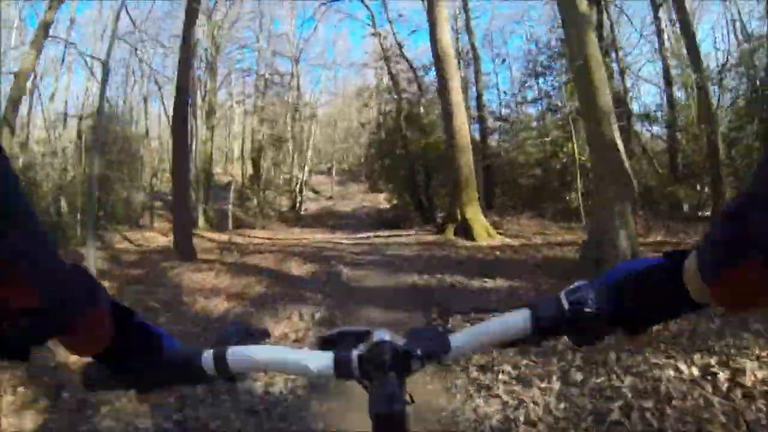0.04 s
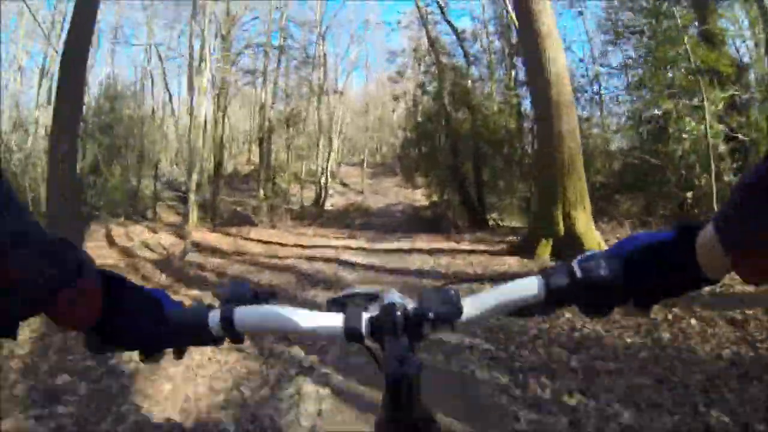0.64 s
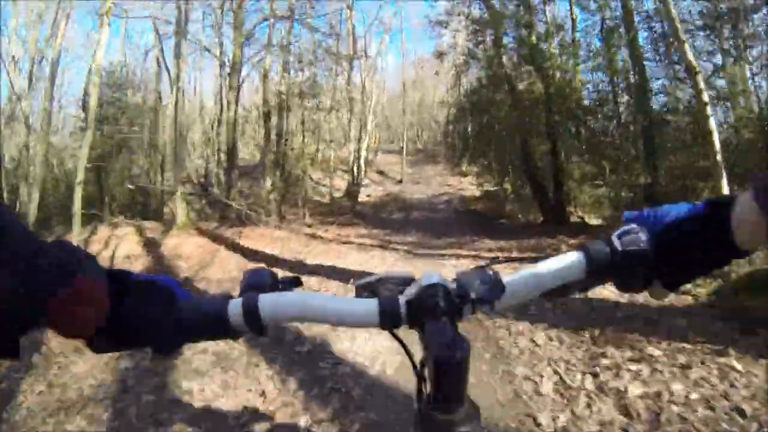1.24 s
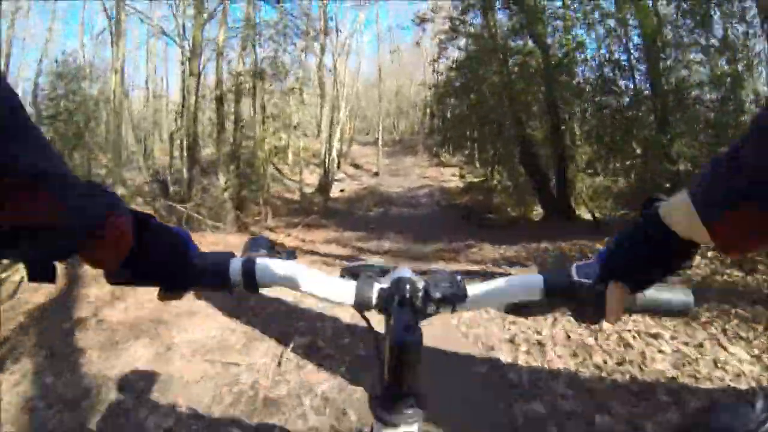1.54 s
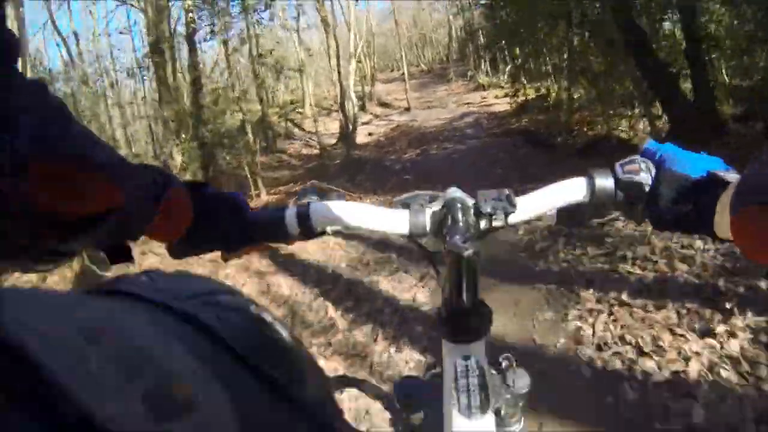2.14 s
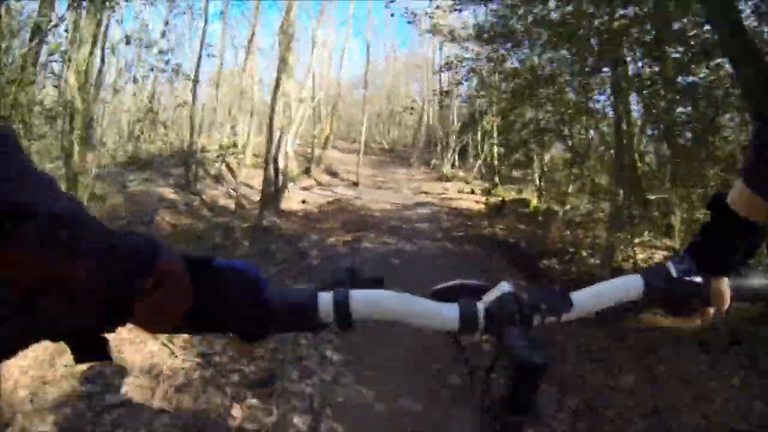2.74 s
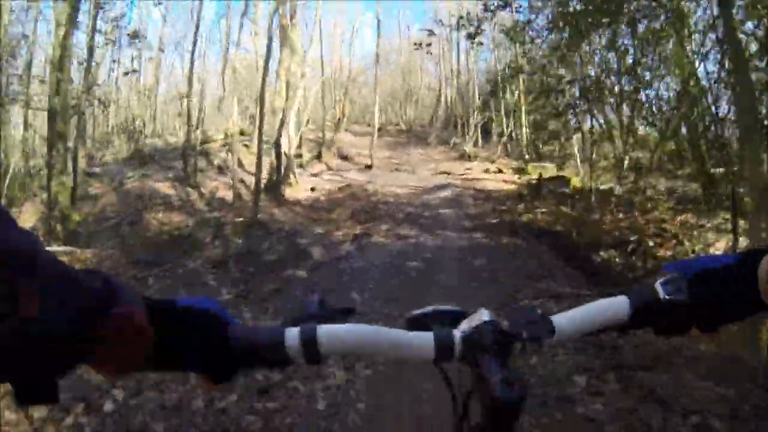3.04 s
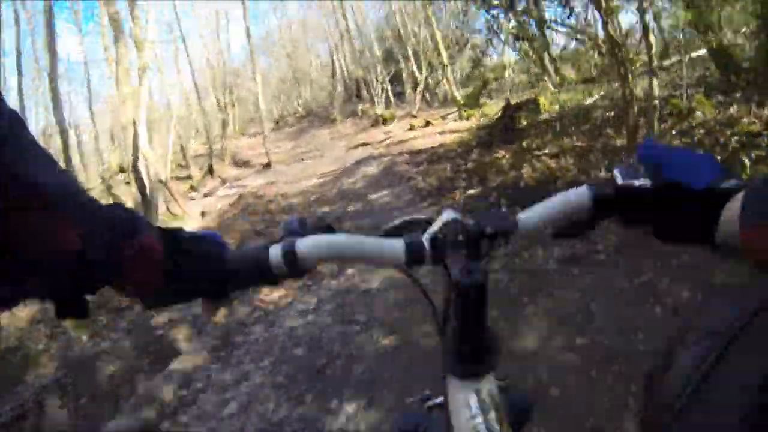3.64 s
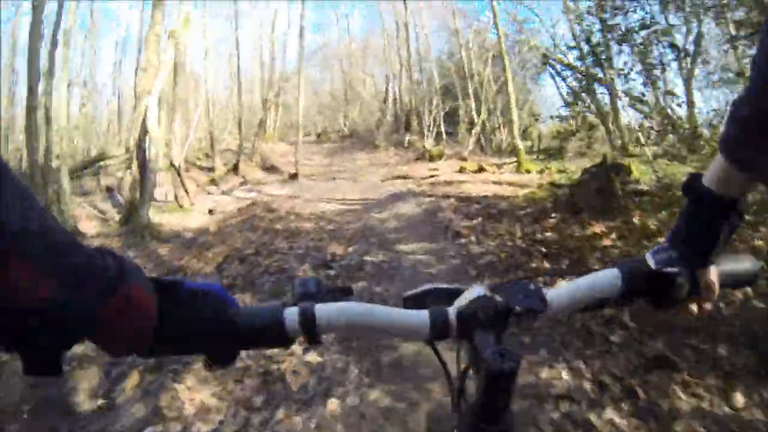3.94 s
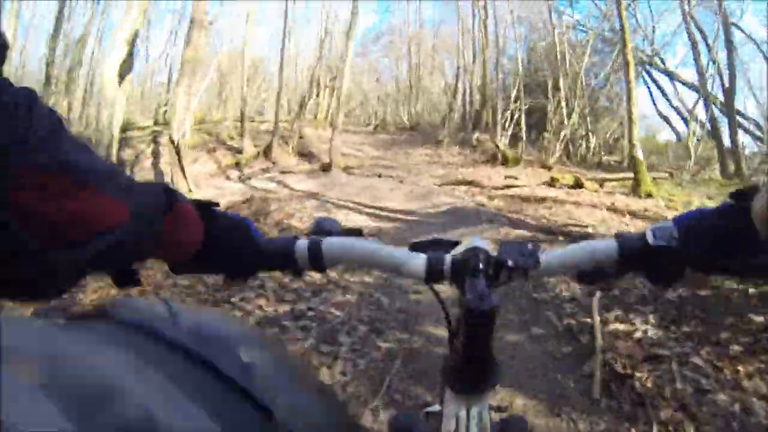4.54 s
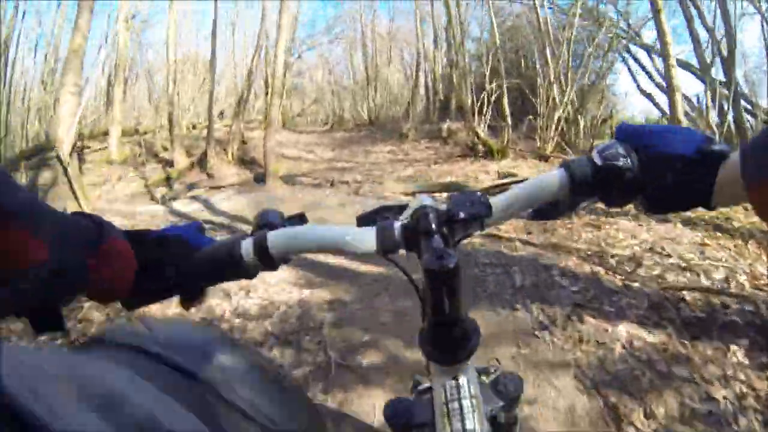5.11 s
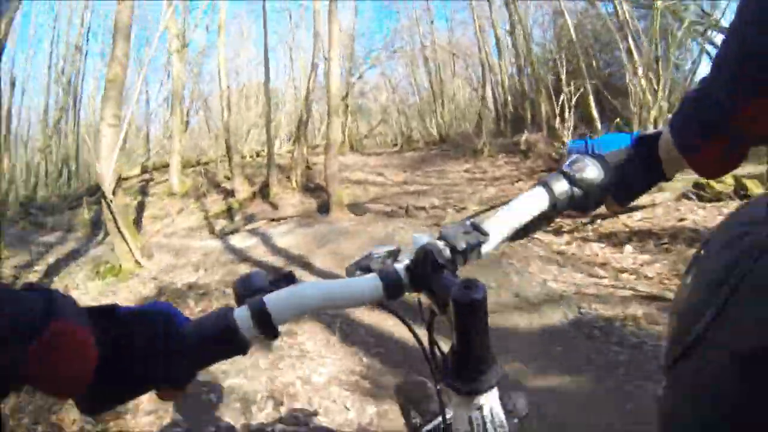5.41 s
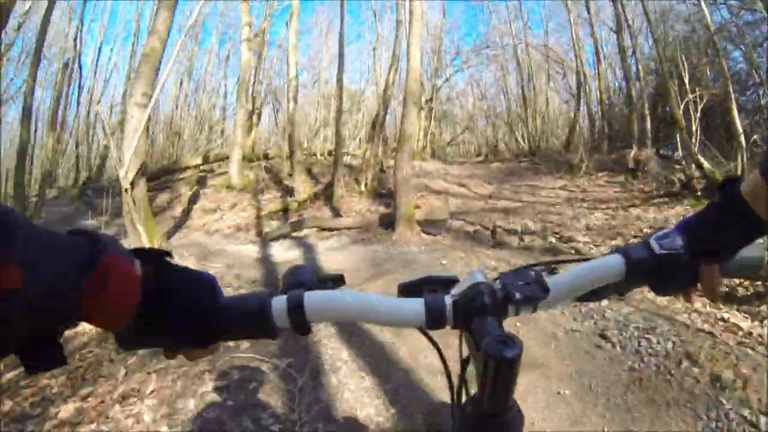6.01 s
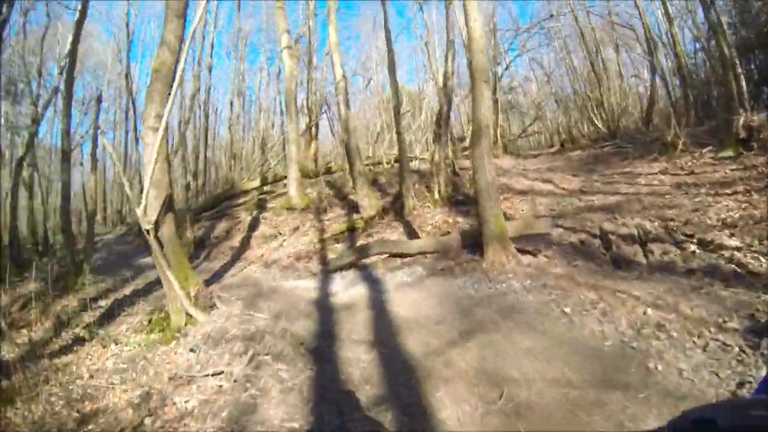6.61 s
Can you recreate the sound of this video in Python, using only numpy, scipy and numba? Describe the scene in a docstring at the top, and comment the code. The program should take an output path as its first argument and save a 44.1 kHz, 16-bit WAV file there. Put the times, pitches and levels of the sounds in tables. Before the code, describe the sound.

Irregular hollow plastic clacks and rattles over buffeting wind and the soft crunch of bicycle tyres on grit and leaves.

```python
"""Mountain bike on a dirt trail

The ride is heard from a body-worn camera in a plastic case. Air buffets the case while the tyres
crunch over grit, dry leaves and loose stones. Up front, bumps make the case rub and knock in its
mount. The gain control ducks after each loud knock, and the hardest ones overload."""
import sys
import numpy as np
from scipy import signal
from scipy.fft import rfft, irfft
from scipy.io import wavfile
from scipy.ndimage import uniform_filter1d
from numba import njit

SR = 44100
rng = np.random.default_rng(int(sys.argv[2]) if len(sys.argv) > 2 else 0)


def file_out(sig):
    """Save sig as 16-bit WAV at sys.argv[1]."""
    # one column per channel
    cols = np.atleast_2d(sig).T
    # limit, then scale
    lim = np.clip(cols, -1, 1)
    pcm = np.round(lim * 32767).astype(np.int16)
    wavfile.write(sys.argv[1], SR, pcm)


N = 302967
TIME = np.arange(N) / SR

# airflow rumble on the case, easing as the bike slows: t/s, level/dB
AIRFLOW_LEVELS = [(0.0, -19), (0.13, -24.5), (0.5, -34.5), (0.99, -29), (1.05, -41.5), (1.42, -23),
                  (2.2, -33), (2.58, -25.5), (2.64, -29), (3.1, -27), (3.14, -32), (3.37, -27.5),
                  (5.3, -36.5), (5.38, -42.5), (5.63, -34.5), (5.99, -50.5), (6.05, -40.5), (6.87, -65)]
# gusts: centre t/s, length/s, rise/dB
GUST_SWELLS = [(0.015, 0.15, 10.5), (.85, 0.16, 11), (1.93, .14, 9), (2.2, 0.41, 10), (2.47, 0.16, 11.5),
               (2.99, 0.31, 8.5), (3.25, 0.18, 6), (3.63, .32, 10.5), (4.06, 0.2, 9.5), (4.5, 0.3, 6),
               (4.98, 0.39, 7.5)]
# deep thump of the big eddies: f/Hz, level/dB
BUFFET_SPECTRUM = [(12, -1), (30, 3), (80, 5.5), (130, 0.5), (190, -13.5), (280, -26), (500, -45.5),
                   (2000, -110)]
# low-mid flutter of the small eddies: f/Hz, level/dB
EDDY_SPECTRUM = [(80, -11), (170, 1.5), (250, -4.5), (350, -9.5), (480, -15.5), (650, -20.5), (900, -25.5),
                 (1300, -35), (3000, -74.5), (9000, -110)]
# tyres biting into loose ground: centre t/s, length/s, rise/dB
TYRE_BITES = [(0, 0.37, 12), (.9, 0.4, 4), (1.8, 0.6, 4.5), (2.4, .4, 4), (3.05, 0.31, 5), (3.65, .22, 5.5),
              (4.19, 0.18, 9.5), (5.25, 0.15, 8), (5.68, 0.19, 8.5), (6.23, 0.28, 9), (6.44, 0.2, 7.5)]
# tone of the tread on dirt: f/Hz, level/dB
TREAD_SPECTRUM = [(150, -9), (400, 3), (900, 4.5), (1250, 0.5), (1800, 2), (2350, -9), (3200, -16.5),
                  (4350, -24), (6000, -31), (7400, -36.5), (10500, -27), (15000, -47.5)]
# case resonances that colour the tyres: f/Hz, width/Hz, level/dB
TREAD_RESONANCES = [(1820, 110, 1.5), (2890, 270, -5), (3500, 200, -13), (5000, 240, -20.5),
                    (8350, 380, -25), (10400, 110, -21)]
# case modes (two of the shell, then mount, bracket and the rest): f/Hz, t60/s, level/dB
CASE_MODES = [(755, 0.024, -15), (894, 0.019, 0.5), (1659, 0.01, 6.5), (1416, 0.014, -8.5),
              (1050, .011, -8), (1975, 0.0064, -0.5), (2410, 0.016, -8), (2852, 0.015, 2.5),
              (3595, 0.02, -9.5), (5000, 0.011, -15), (7200, 0.005, -25), (8100, 0.013, -23),
              (10530, 0.0058, -9.5)]
# faint, longer rings of the fittings after a knock: f/Hz, t60/s, level/dB
FITTING_MODES = [(770, .05, -34), (1830, .05, -37), (2480, .06, -20), (2900, .5, -46), (3160, .12, -31),
                 (5250, .08, -40), (5440, .08, -38)]
# plastic and straps rubbing: start t/s, length/s, level/dB, mount ring/dB
RUB_CUES = [(0.0, 0.1, -53, 1), (0.207, 0.085, -45.5, 16), (0.75, 0.023, -48.5, 2), (1.615, 0.11, -47, 24),
            (2.13, 0.028, -35, 22), (2.144, 0.17, -52, 31), (3.016, 0.025, -48, 0), (3.596, 0.042, -57, 7),
            (3.94, 0.033, -52, 2), (4.365, 0.013, -52, 1), (4.591, 0.15, -44.5, 5), (5.114, 0.1, -41.5, 5),
            (5.881, 0.083, -58, -3), (6.592, 0.059, -53.5, -1.5)]
# the case knocking in its mount: t/s, level/dB, mount ring/dB, contact corner f/Hz
KNOCK_CUES = [(0.0535, -6.5, 14, 1740), (0.2, -7.5, 15, 1420), (0.2706, -32, 14.5, 1700),
              (0.398, -38, 9.5, 1700), (0.4597, -8, 3.5, 3500), (0.721, -13.5, -1, 1790),
              (1.0047, -11.5, 14, 1670), (1.048, -14.5, 2.5, 1880), (1.2811, -13, -0.5, 1650),
              (1.6132, -7.5, -0.5, 1530), (1.6938, -21, 12, 1980), (1.8253, -7.5, 8, 1450),
              (1.9413, -7.5, -6, 2950), (2.017, -34, 7, 4500), (2.1254, -7, -0.5, 2900),
              (2.2475, -34.5, 3.5, 4500), (2.2888, -24.5, 12.5, 850), (2.63, 2.5, -8.5, 2400),
              (2.6656, -19.5, -5.5, 1880), (3.0228, -33.5, 13, 8100), (3.114, -4.5, 17, 1100),
              (3.434, -27, 3.5, 3000), (3.4944, -11, 2, 2490), (3.7853, -0.5, -6.5, 1590),
              (3.8913, -7.5, -7.5, 1450), (3.937, -12.5, -16, 1870), (4.2466, -5.5, 10, 970),
              (4.3394, -12, -1.5, 3500), (4.549, -9, 0.5, 3900), (4.5853, -11, 1.5, 2470),
              (4.6263, -16, 13.5, 2750), (4.6308, -10, 7, 2280), (4.689, -15.5, 17.5, 1900),
              (5.0677, 4, -5.5, 1650), (5.118, 2.5, -11, 2410), (5.1513, -14.5, 7.5, 3200),
              (5.1756, -27.5, 13, 3300), (5.1865, -15, 9, 2300), (5.4616, -5, -10, 1560),
              (5.7155, -10.5, 3.5, 3300), (5.8007, -9, -0.5, 3600), (5.8482, -24.5, -2, 1300),
              (6.5006, -3, -2, 1630), (6.5509, -6.5, -3, 695), (6.646, -30.5, 3.5, 1800)]


def undb(db):
    """Decibels to gain."""
    return 10 ** (np.asarray(db) / 20)


def unit(x):
    """Scale to rms 1."""
    return x / np.sqrt(np.mean(x ** 2) + 1e-18)


def add(out, start_s, x):
    """Mix x into out from start_s."""
    i = max(0, int(start_s * SR))
    out[i:i + len(x)] += x[:max(0, len(out) - i)]


def swells(table):
    """A fader ride in dB, made of bell-shaped rises."""
    return sum(db * np.exp(-(2 * (TIME - centre) / length) ** 2) for centre, length, db in table)


def wander(rate_hz):
    """Random modulator at rms 1: stepped values, smoothed twice."""
    hold = max(2, int(SR / rate_hz))
    steps = np.repeat(rng.standard_normal(N // hold + 1), hold)
    return unit(uniform_filter1d(uniform_filter1d(steps, hold), hold)[:N])


def colour(x, spectrum, resonances=()):
    """EQ by a smooth curve plus a few resonant peaks."""
    f = np.arange(len(x) // 2 + 1) * SR / len(x)
    hz, db = np.transpose(spectrum)
    power = undb(np.interp(np.log(f + 1), np.log(hz), db)) ** 2
    for centre, width, peak_db in resonances:
        power += undb(peak_db) ** 2 / (1 + ((f - centre) / width) ** 2) ** 2
    return irfft(rfft(x) * np.sqrt(power), len(x))


def grains(samples, per_s, spread_db):
    """Random clicks, many small and a few large."""
    fires = rng.random(samples) < per_s / SR
    size = np.minimum(rng.exponential(size=samples), 2 * np.pi)
    return fires * undb(spread_db * size) * rng.choice([-1, 1], samples)


def contact(x, corner_hz, low_hz=620):
    """A soft contact loses treble; a small shell radiates no bass."""
    pole = np.exp(-2 * np.pi * corner_hz / SR)
    softened = signal.lfilter([(1 - pole) ** 2], np.poly([pole, pole]), x)
    return signal.sosfilt(signal.butter(2, low_hz, "high", fs=SR, output="sos"), softened)


def ring(modes, extra_db=0, samples=4096):
    """Damped modes struck together."""
    hz, t60, db = np.transpose(modes)
    t = TIME[:samples]
    waves = np.exp(-np.log(1000) * t / t60[:, None]) * np.cos(2 * np.pi * hz[:, None] * t)
    return -undb(db + extra_db) @ waves * np.heaviside(t, .5)


def case_ring(boom_db, mount_db, detune=.01, scatter_db=2.5):
    """The plastic case rings; the point of contact sets how much each mode speaks."""
    modes = np.array(CASE_MODES, float)
    modes[:, 0] *= 1 + detune * rng.standard_normal(len(modes))
    extra_db = scatter_db * rng.standard_normal(len(modes))
    bracket_db = .3 * max(mount_db, 0)
    extra_db[:4] = boom_db, boom_db, mount_db, bracket_db
    return ring(modes, extra_db)


def wind(surge_db=1.57, flutter_db=2.5, buffet_db=-28, eddy_db=-37.5, cruise_db=-28):
    """Big slow eddies thump the case; gusts mostly shed smaller ones that flutter fast."""
    flow_db = np.interp(TIME, *np.transpose(AIRFLOW_LEVELS)) - cruise_db
    gust_db = swells(GUST_SWELLS)
    surge = undb(surge_db * wander(rate_hz=25.004))
    buffet = unit(colour(rng.standard_normal(N), BUFFET_SPECTRUM) * surge)
    flutter = rng.standard_normal(N) * undb(flutter_db * wander(rate_hz=70))
    eddies = unit(colour(flutter, EDDY_SPECTRUM) * surge)
    buffet *= undb(buffet_db + flow_db + .16 * gust_db)
    eddies *= undb(eddy_db + 1.16 * flow_db + gust_db)
    return buffet + eddies


def tyres(rolling_db, crack_s=.00073):
    """Knobs crush grit and leaves in tiny bursts over a brighter rolling hiss."""
    cracks = np.abs(grains(N, per_s=300, spread_db=4))
    bursts = signal.lfilter([1], [1, -np.exp(-1 / (crack_s * SR))], cracks)
    grit = contact(unit(bursts * rng.standard_normal(N)), corner_hz=7000, low_hz=1200)
    patch_db = .7 * wander(rate_hz=35)  # the ground varies from patch to patch
    hiss = rng.standard_normal(N)
    return colour((grit + hiss) * undb(rolling_db + patch_db), TREAD_SPECTRUM, TREAD_RESONANCES)


def stones(rolling_db, count=130, spread_db=6, crumble_s=.0011):
    """Stones and twigs crunch at random, harder where the tyres bite, heard through the case."""
    out = np.zeros(N)
    for place, size in rng.random((count, 2)):
        i = int(place * N)
        body = case_ring(boom_db=-9.5, mount_db=-1)
        crumble = rng.standard_normal(len(body)) * np.exp(-TIME[:len(body)] / crumble_s)
        tick = contact(signal.fftconvolve(crumble, body), corner_hz=1500, low_hz=2800)
        tick = contact(tick, corner_hz=5960)
        peak_db = rolling_db[i] + spread_db * (2 * size - 1)
        add(out, TIME[i], undb(peak_db) * tick / np.max(np.abs(tick)))
    return out


def rubs(trim_db=1.5):
    """Plastic and straps move in dense little slips that scratch brightly and ring the case."""
    out = np.zeros(N)
    for start_s, length_s, db, mount_db in RUB_CUES:
        samples = int(length_s * SR)
        arch = np.sin(np.pi * np.arange(samples) / samples)
        slips = grains(samples, per_s=6000, spread_db=3) * arch
        rub = signal.fftconvolve(slips, case_ring(boom_db=4.5, mount_db=mount_db))
        add(rub, 0, slips)
        rub = contact(rub, corner_hz=6000)
        rms = np.sqrt((np.sum(rub ** 2) + 1e-18) / samples)
        add(out, start_s, undb(db + trim_db) * rub / rms)
    return out


def chatter(boom_db, chatter_s=.0053, slide_db=-20, slide_s=.014):
    """After a hit the parts keep touching for a few milliseconds, then slide to rest."""
    body = case_ring(boom_db, mount_db=2.5)
    t = TIME[:len(body)]
    rattle = np.exp(-t / chatter_s)
    slide = undb(slide_db) * np.exp(-t / slide_s)
    attack = 1 - rattle
    touches = attack * (rattle + slide) * rng.standard_normal(len(t))
    return signal.fftconvolve(touches, unit(body) / np.sqrt(len(t)))[:len(t)]


def rebound(clack, mount_db):
    """The shell touches again a millisecond or two later, hollowing its ring; the mount seats cleanly."""
    out = clack.copy()
    bounce_gain = .45 / (1 + undb(mount_db) / 2)
    add(out, rng.uniform(.0008, .0026), bounce_gain * clack)
    return out


def knocks(firm_hz=1900, boom_db_per_octave=3.5, chatter_db=-14, wall_hz=8500):
    """Each bump slaps the case against its mount: a clack, a brief chatter, faintly ringing fittings."""
    out = np.zeros(N)
    for start_s, db, mount_db, corner_hz in KNOCK_CUES:
        # the shell's boom follows the contact corner, and drops a little when the mount takes the blow
        boom_db = -.24 + boom_db_per_octave * np.log2(corner_hz / firm_hz) - .1 * max(mount_db, 0)
        clack = case_ring(boom_db, mount_db)
        settling = undb(chatter_db) * chatter(boom_db - 8)
        knock = ring(FITTING_MODES, extra_db=1, samples=12000)
        add(knock, 0, rebound(clack, mount_db) + settling)
        add(out, start_s, undb(db) * contact(knock, corner_hz))
    # the case wall dulls the very top
    return signal.sosfilt(signal.butter(1, wall_hz, fs=SR, output="sos"), out)


def scene(tyre_db=-50.5, slows_at_s=4.9, fade_db_per_s=1):
    """Mono mix; tyres and stones share one fader that swells with each bite and eases as the bike slows."""
    rolling_db = tyre_db - fade_db_per_s * np.maximum(TIME - slows_at_s, 0) + swells(TYRE_BITES)
    return (knocks() + rubs() + stones(rolling_db) + wind() + tyres(rolling_db))[None]


@njit
def follow(x, attack_s, release_s):
    """Envelope follower with separate attack and release."""
    out, level = np.empty(len(x)), 0.
    for i in range(len(x)):
        level += (x[i] - level) / (SR * (attack_s if x[i] > level else release_s))
        out[i] = level
    return out


def record(dry, lag_s=.005, threshold=.2, top_hz=15000):
    """Gain control reacts too late for a hard knock, so the knock overloads and what follows ducks."""
    level = follow(np.minimum(np.abs(dry[0]), 1), attack_s=.0037, release_s=.23)
    late_level = np.interp(TIME - lag_s, TIME, level)
    ducked = dry / np.maximum(1, late_level / threshold)
    saturated = ducked / (1 + ducked ** 6) ** (1 / 6)
    return signal.sosfilt(signal.ellip(8, .1, 80, top_hz, fs=SR, output="sos"), saturated)


dry = scene()
out = record(dry)
file_out(out)
```